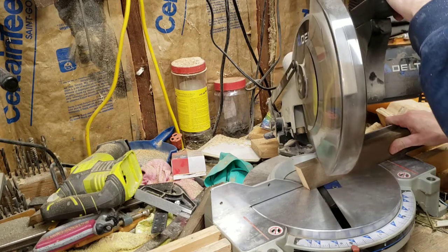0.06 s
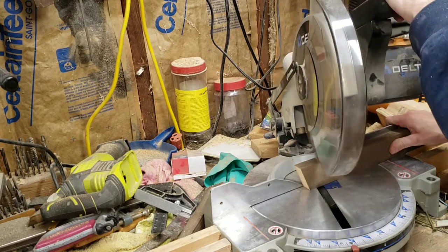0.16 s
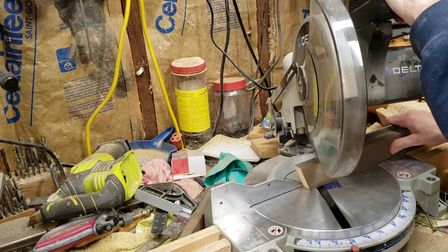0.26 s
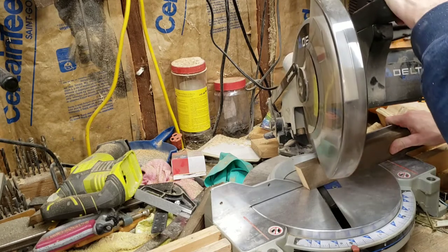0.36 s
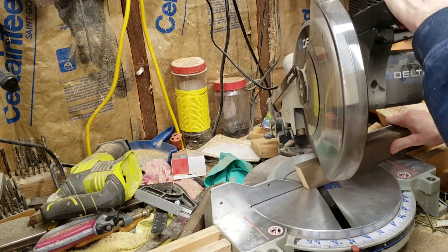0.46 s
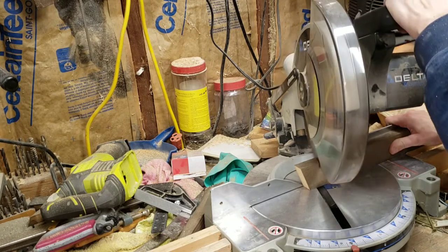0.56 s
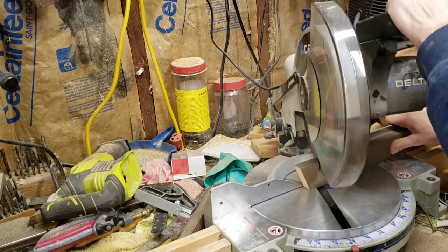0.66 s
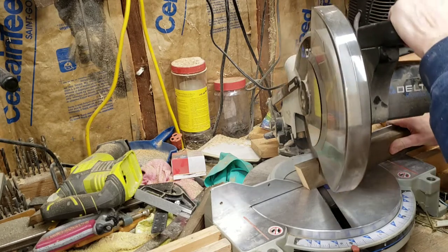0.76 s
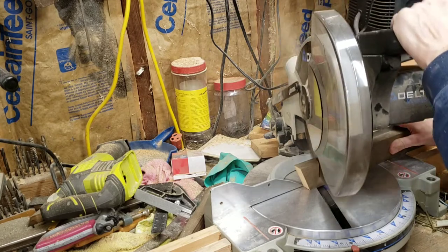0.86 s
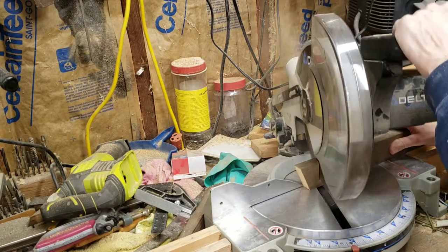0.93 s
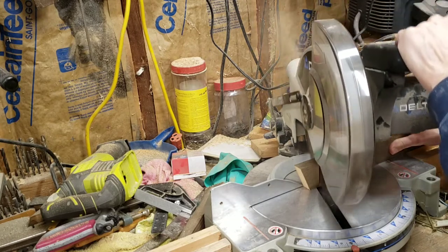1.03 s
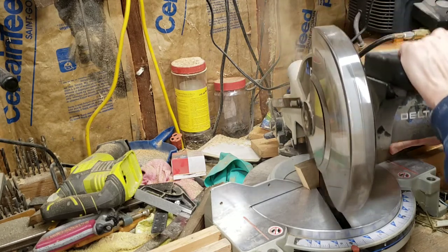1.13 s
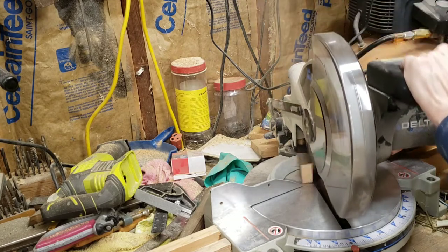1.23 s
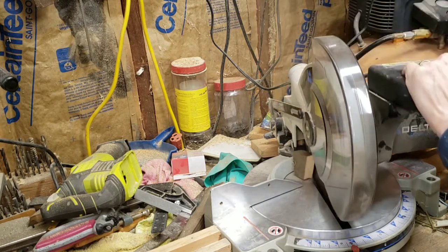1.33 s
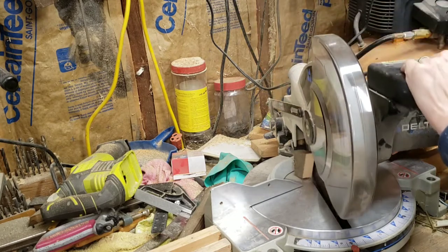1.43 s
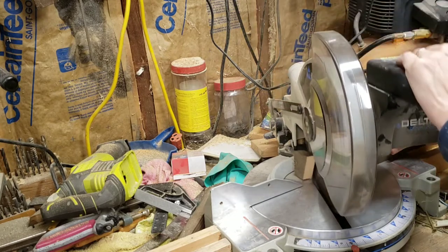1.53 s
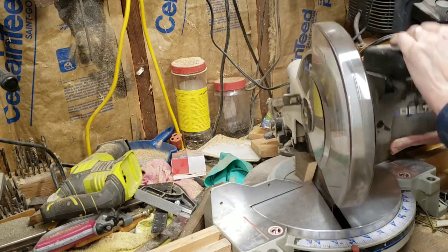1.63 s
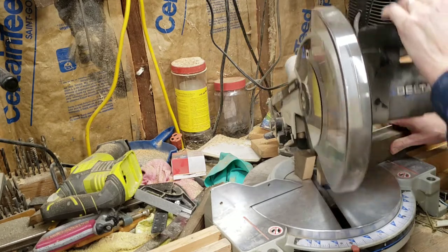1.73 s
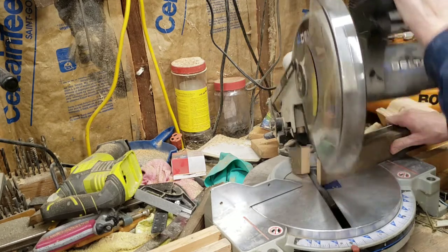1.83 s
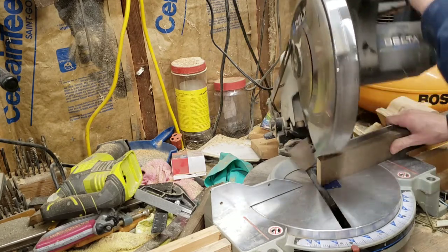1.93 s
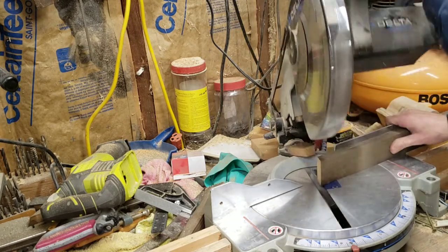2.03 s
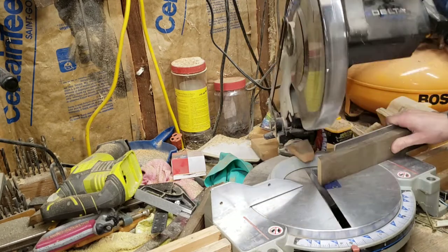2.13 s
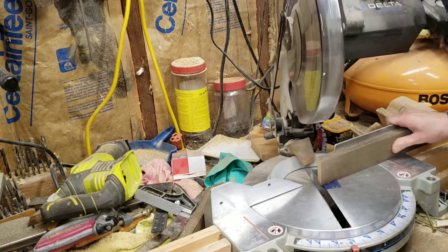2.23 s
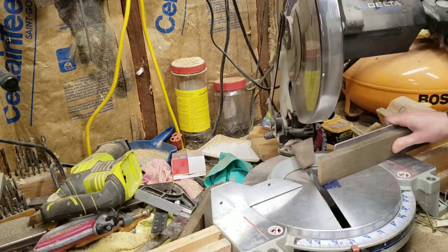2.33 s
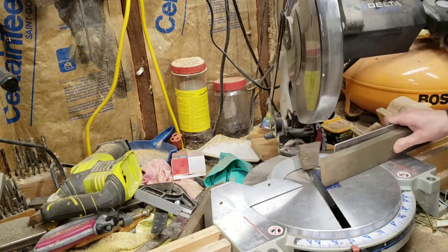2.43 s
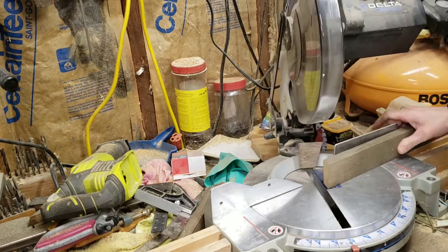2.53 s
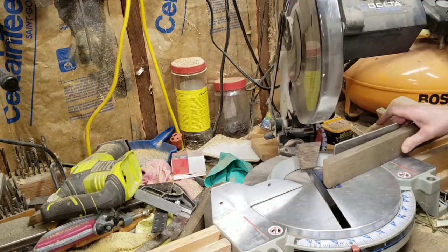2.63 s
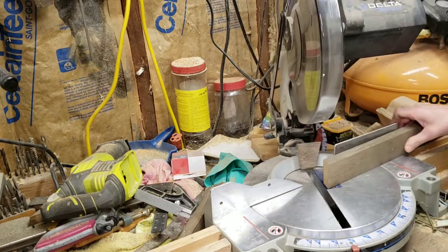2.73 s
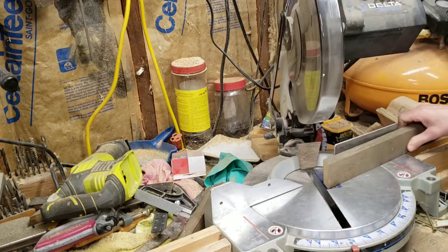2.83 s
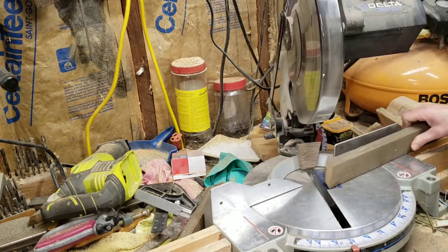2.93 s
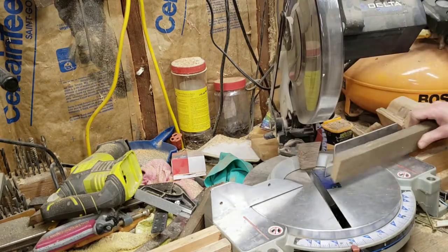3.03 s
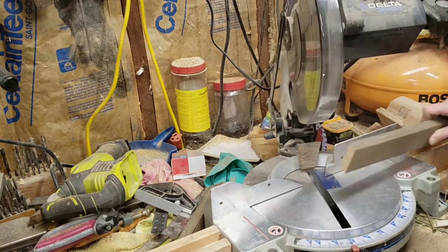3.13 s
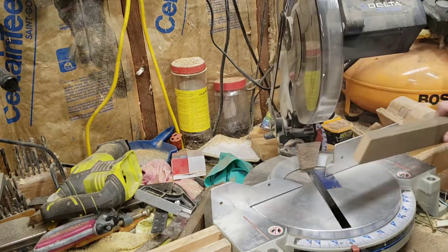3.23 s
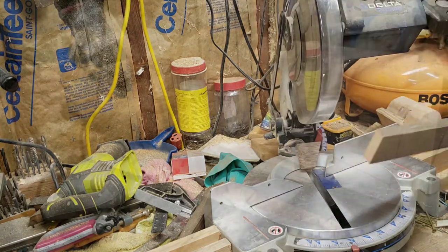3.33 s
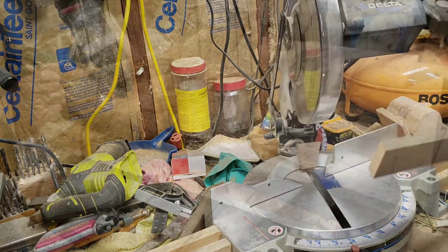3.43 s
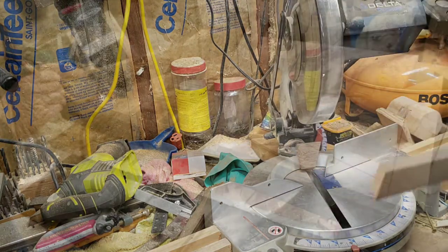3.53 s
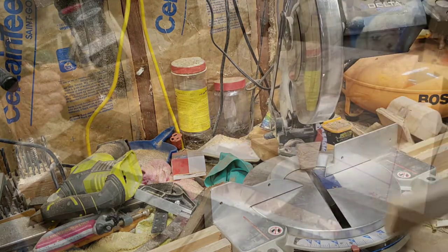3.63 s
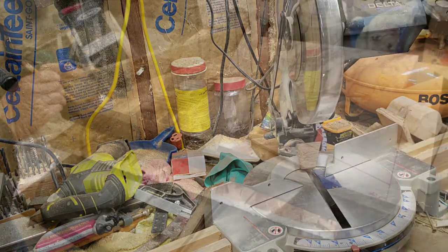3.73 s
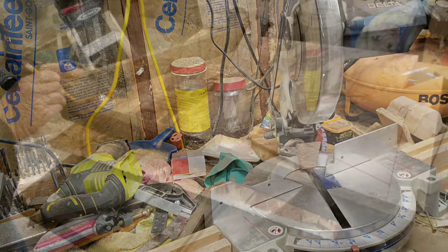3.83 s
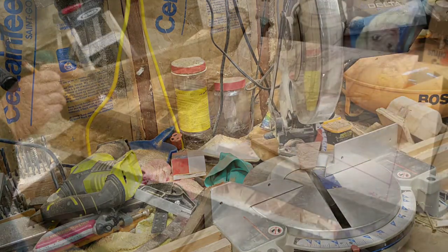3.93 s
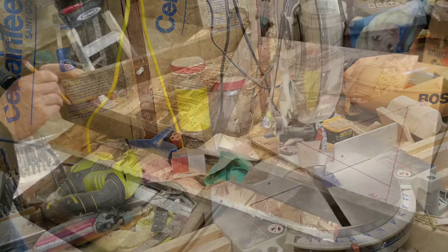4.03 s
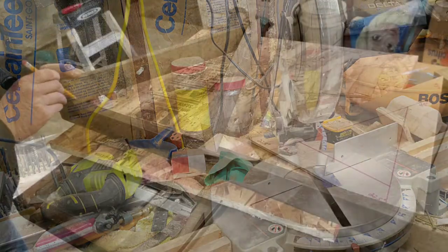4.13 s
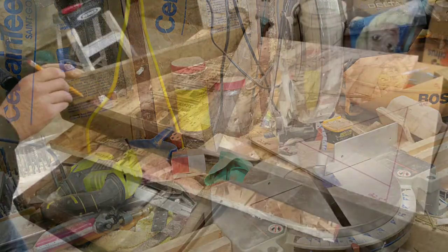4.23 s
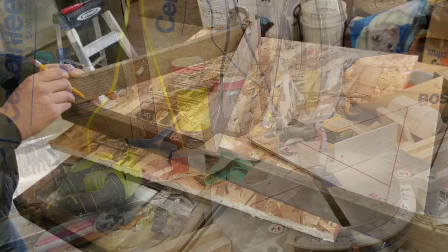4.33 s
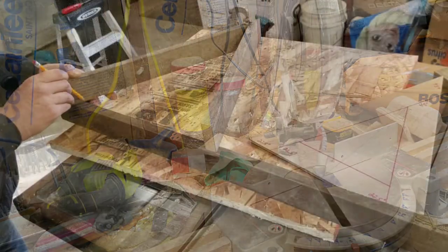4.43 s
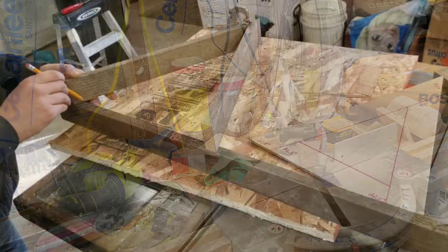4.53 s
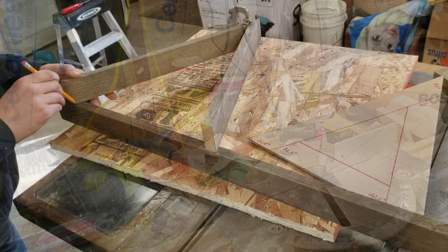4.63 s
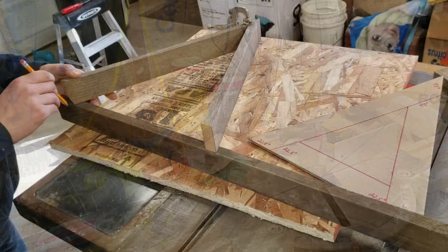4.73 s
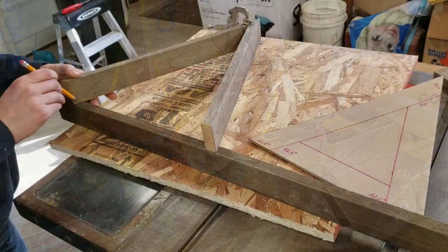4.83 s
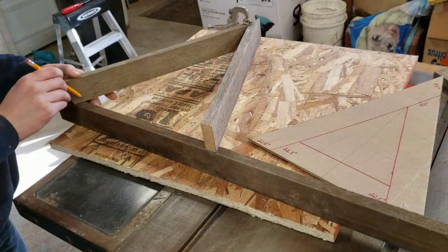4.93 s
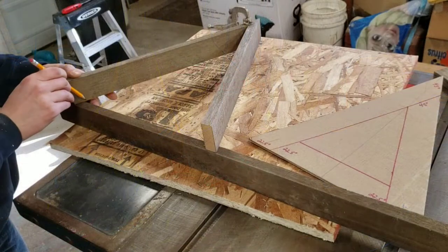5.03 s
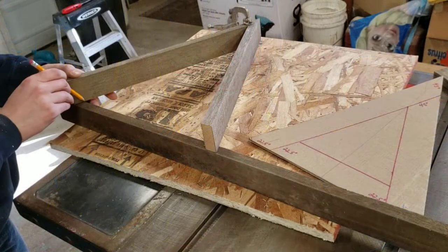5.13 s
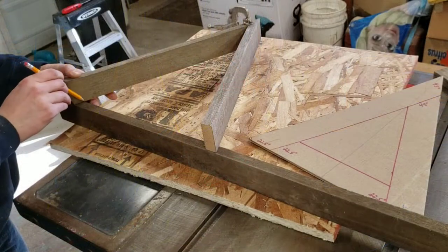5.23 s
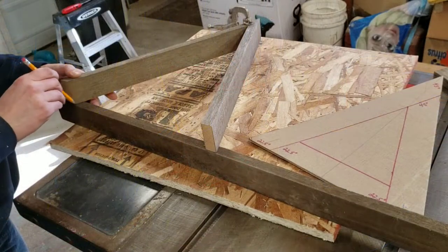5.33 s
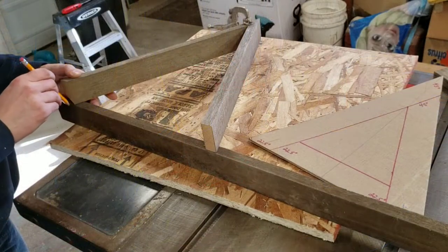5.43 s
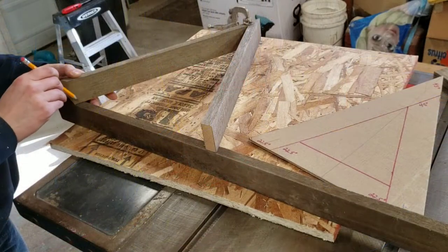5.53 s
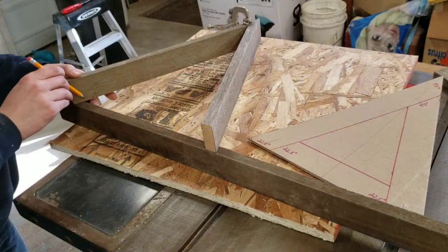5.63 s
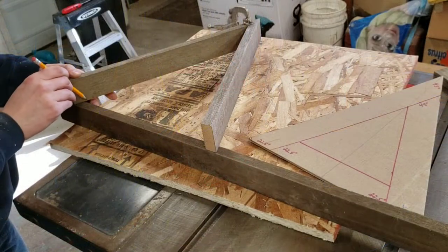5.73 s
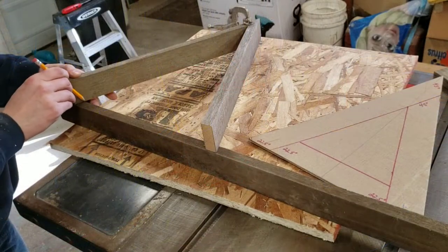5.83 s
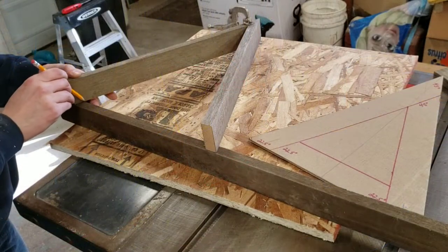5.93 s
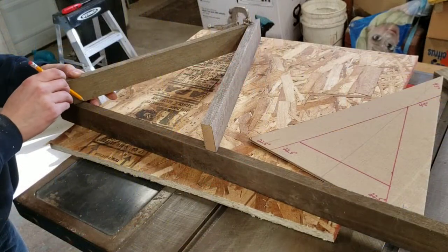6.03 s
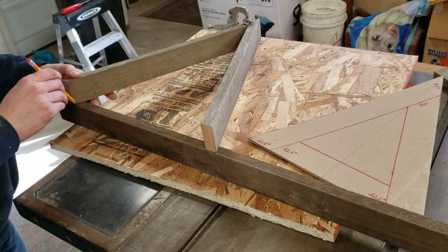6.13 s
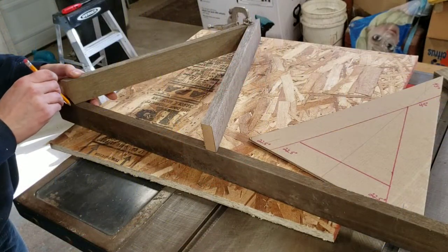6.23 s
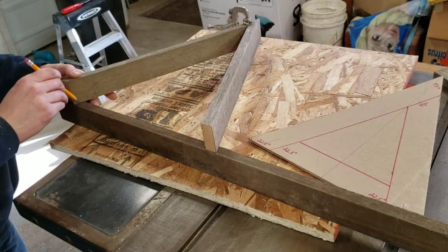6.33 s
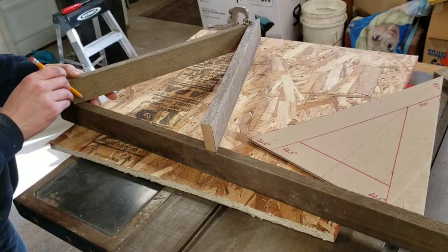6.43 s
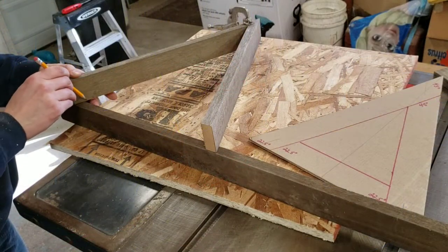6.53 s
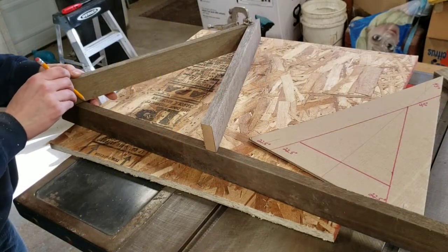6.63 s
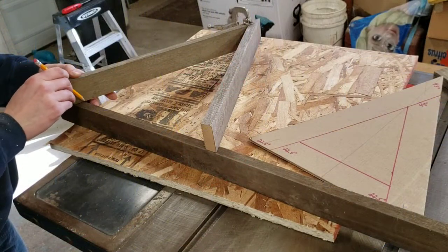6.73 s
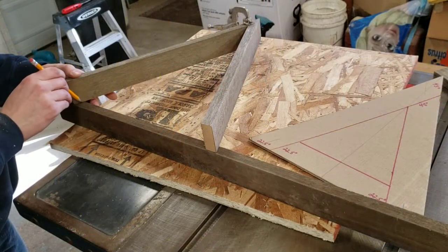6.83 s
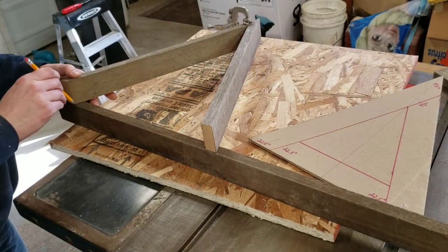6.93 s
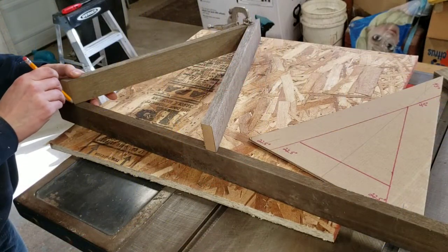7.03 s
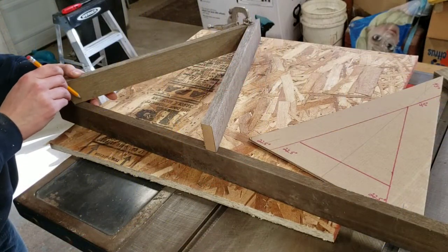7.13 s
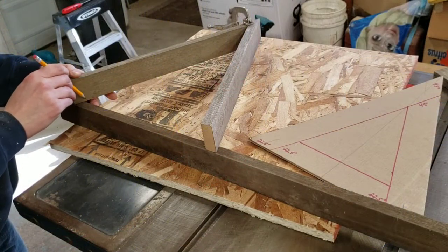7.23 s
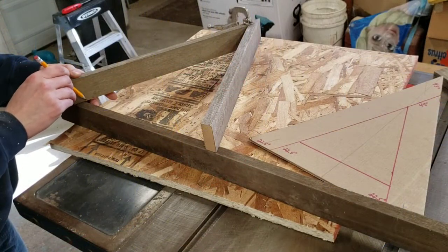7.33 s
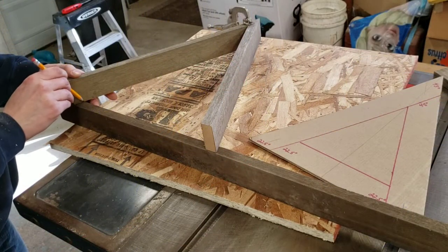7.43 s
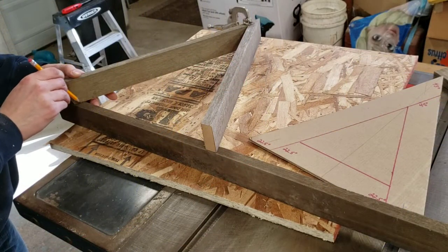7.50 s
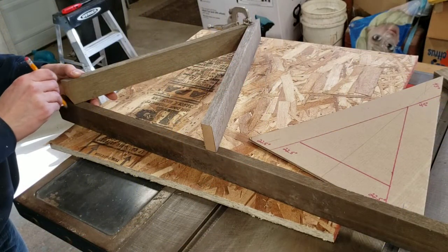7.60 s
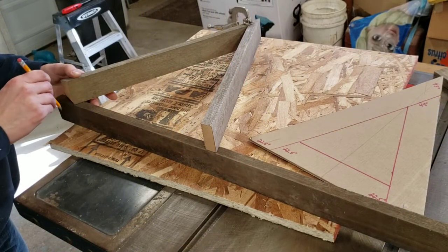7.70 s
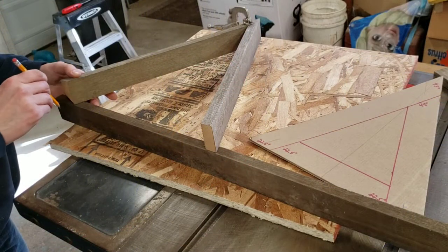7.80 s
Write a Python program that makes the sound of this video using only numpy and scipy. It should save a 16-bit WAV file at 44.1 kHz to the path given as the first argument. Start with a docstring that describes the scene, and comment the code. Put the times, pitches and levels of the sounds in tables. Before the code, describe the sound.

From 0 to about 1.2 s a miter saw is already cutting wood: a loud, harsh, bright rasp, with a high singing tooth tone and metallic blade ringing over motor roar, settling in during the first quarter second. The rasp stops abruptly, leaving the fan roar. At 1.48 s the trigger releases with a small ringing click and narrow hiss; at 1.66-1.85 s the teeth brush wood again. From about 1.8 s a many-toned gear whine appears and slides steadily down in pitch as the blade coasts, fading from 2.5 s to silence at 4.02 s. Almost at once a quiet workshop gradually fades in until 6.1 s: soft hiss, faint drone, low uneven rumble. Short dry board scrapes, gritty with little woody knocks, come near 4.6 (very faint), 5.3, 6.1, 6.9 and 7.5 s. Close stereo, short room reflections.

```python
"""A miter saw finishes a cut through a board, brushes the wood again as it lifts, and coasts down with a gear whine.
Rasping teeth, lines locked to the blade speed, fixed ringing modes and a fan roar make up the saw.
It fades out; after a short silence a quiet workshop fades in, with shaped hiss, a faint drone and rumble.
There a wooden board is nudged along a bench in short scrapes: stick-slip clicks ring its modes under bright grit.
A pair of capsules hears it all, alike in the bass and unrelated in the treble."""
import sys
import numpy as np
from scipy import signal
from scipy.fft import rfft, irfft, next_fast_len
from scipy.io import wavfile
from scipy.ndimage import uniform_filter1d

SR = 44100
rng = np.random.default_rng(int(sys.argv[2]) if len(sys.argv) > 2 else 0)


def master(y):
    """Save y as 16-bit WAV."""
    cut = np.clip(np.atleast_2d(y).T, -1, 1)
    pcm = np.round(cut * 32767)  # scale
    wavfile.write(sys.argv[1], SR, pcm.astype(np.int16))


N = 346626
T = np.arange(N) / SR

# Silence between the two places: its start and its end in seconds.
FADE_GAP = (4.02, 4.038)
STOP = round(FADE_GAP[0] * SR)  # samples for which the saw is heard
SAW_T = np.arange(STOP) / SR
# Likeness of the two capsules. Each row: frequency in Hz, left-right correlation.
LIKENESS = [(60, .92), (130, .9), (290, .94), (640, .8), (1410, .35), (3100, 0), (15000, -.05)]


def cutting():
    """Teeth rasp the wood, sing at multiples of the tooth rate and ring the blade plate at its own modes."""
    # Teeth in the wood. Each row: start in seconds, end in seconds, cutting level in dB,
    # tooth tone in dB above it, ring of the blade in dB above it.
    contact_rows = [(-.1, 1.175, -40, 3, 0.4), (1.656, 1.846, -41, -140, 0)]
    # The long cut settles in: start offsets of cutting, tooth tone and ring in dB.
    bite_db = (-2.5, -18, -7.5)
    # Relative spectrum of the rasp. Each row: frequency in Hz, density in dB per Hz.
    rasp_spectrum = [(60, -34), (140, -19.5), (200, -10.5), (270, -15.5), (400, -40), (880, -44),
                     (1500, -23), (2070, -26.5), (2310, 0), (2650, -20), (2920, -2.5), (3190, -7.5),
                     (3880, 0.5), (4860, -1.5), (7190, 1.5), (8410, -8), (12200, 1), (15600, -14)]
    # Pitches of the tooth tone in cycles per blade turn.
    tooth_orders = [40, 80, 120, 160, 200]
    # Each row, one a tooth pitch: relative level in dB, own growth along the cut in dB per second.
    tooth_rows = [(-14, 11), (-6, -8), (-15, -6), (-9.5, -2), (-5.5, -2)]
    # Modes of the blade plate in Hz.
    plate_hz = [3420, 3967, 4269, 4387, 4570, 5163, 5545, 6060, 6500, 7047, 10363, 12478, 13851, 14686,
                14890, 15111]
    # Each row, one a plate mode: width in Hz before widening by half, relative level in dB,
    # growth along the cut in dB per second.
    plate_rows = [(45, -9.5, -12.5), (12, -10.5, 3.5), (16, -18, 14.5), (18, -14.5, 12.5), (29.9, -9, -0.5),
                  (24.2, -9.5, -5), (16, -8, -2), (45, -11, 1.5), (35, -13.5, 2), (24, -7.5, -2),
                  (16, -12.5, -0.5), (30, -23, -3.5), (25, -21.5, -1), (24, -14.5, 1.5), (16, -14.5, 6),
                  (18, -13.5, 3.5)]
    # A broad howl while the blade is deep in the board. Each row: time in seconds, pitch in Hz, level in dB.
    howl_rows = [(0.0, 3654, -38), (0.258, 3710, -42), (0.328, 3750, -35), (0.374, 3680, -47),
                 (0.506, 3755, -35), (0.548, 3760, -51), (0.62, 3700, -47.5)]
    bite_s, touch_s, leave_db_per_s = 0.26, 0.037, 150.5
    shared_tooth_growth_db_per_s = 4.5

    early = np.maximum(1 - SAW_T / bite_s, 0)
    contacts = []
    for start, end, db, _, _ in contact_rows:
        touch_db = stroke(SAW_T, start, end, touch_s, 15, leave_db_per_s)
        contacts.append(gain_of(db + bite_db[0] * early + touch_db))
    # seconds from a moment inside the long cut; zero from the second contact on
    along = np.where(SAW_T < contact_rows[1][0], SAW_T - .6, 0)

    rasp = sum(contacts) * gain_of(3) * noise(rasp_spectrum, patchy_db=1.6, count=STOP)

    tooth_level = sum(c * gain_of(row[3]) for c, row in zip(contacts, contact_rows))
    tooth_level = tooth_level * gain_of(bite_db[1] * early + shared_tooth_growth_db_per_s * along)
    tooth_gains = [gain_of(db + grow * along) for db, grow in tooth_rows]
    sing = tooth_level * orders(tooth_orders, tooth_gains, width=12, flicker_db=2)

    ring_level = sum(c * gain_of(row[4]) for c, row in zip(contacts, contact_rows))
    ring_level = ring_level * gain_of(bite_db[2] * early)
    plate = 0
    for hz, (width, db, grow) in zip(plate_hz, plate_rows):
        plate = plate + gain_of(db + grow * along) * tone(hz * SAW_T, 1.5 * width, 0, flicker_db=1.5)

    howl_cycles = np.cumsum(saw_curve(howl_rows, outside=3700)) / SR
    howl = gain_of(saw_curve(howl_rows, column=2)) * tone(howl_cycles, width=120, steady=0.3)
    return rasp + sing + ring_level * plate + howl


def motor():
    """Fan roar, its treble lifted or dulled by a slow curve, and a hum locked to the shaft turns."""
    # Each row: time in seconds, level of the roar's low part in dB, lift of the air hiss in dB.
    motor_rows = [(0, -41.5, -4.5), (.28, -46, -2.5), (.95, -48.5, -2), (1.25, -49.5, -.5), (1.6, -50, 1.5),
                  (1.84, -50, .6), (2.55, -56, .4), (3.2, -57, .4), (3.7, -53, -.5)]
    # Relative spectrum of the roar. Each row: frequency in Hz, density in dB per Hz.
    roar_spectrum = [(15, -72.5), (25, -37.5), (64, -24), (136, -21), (282, -15), (446, 1), (510, -5.5),
                     (600, -3), (1380, -8.5), (2240, -4.5), (2500, -3), (5460, -3.5), (6950, -11),
                     (8170, -17), (15600, -13)]
    # Pitches of the hum in cycles per blade turn.
    shaft_orders = [1, 5, 5.54]
    # Level of each pitch in dB relative to the roar's low part; the bench resonance also scales the first.
    shaft_db = [-25.5, -26, -19]
    shake_hz, shake_width_hz = 68, 26  # bench resonance

    roar = noise(roar_spectrum, patchy_db=1.5, count=STOP)
    low = signal.sosfiltfilt(signal.butter(2, 1800, fs=SR, output="sos"), roar)
    s, level_db, lift_db = np.transpose(motor_rows)
    body = low + (roar - low) * gain_of(np.interp(SAW_T, s, lift_db))
    # the bench shakes while the shaft rate lies near its resonance
    shake = 1 / (1 + (2 * (speed() - shake_hz) / shake_width_hz) ** 2)
    shaft_gains = [gain_of(db) * (shake if k == 1 else 1) for k, db in zip(shaft_orders, shaft_db)]
    hum = orders(shaft_orders, shaft_gains, width=8, flicker_db=5.0)
    return gain_of(np.interp(SAW_T, s, level_db)) * (body / np.std(low) + hum)


def gear_whine():
    """Unloaded gears sing at multiples of the falling speed, louder where the housing passes the pitch."""
    # Pitches of the gear lines in cycles per blade turn.
    gear_orders = [3, 4, 6.55, 30.5, 32, 34.5, 35, 36, 37, 37.5, 40, 72, 80, 107, 108, 109, 144, 224.5]
    # Relative level of each line in dB, before the housing.
    gear_db = [-26, -19.5, -16.5, -18.5, -18.5, -16.5, -16.5, -3, -15, -17.5, -12, -17, -18, -14, -9, -13.5,
               -9, -11.5]
    # What the housing passes. Each row: frequency in Hz, gain in dB.
    housing_gain = [(170, -24), (198, 1.5), (222, -17), (275, -4.5), (340, 2.5), (420, -5), (1650, 4.5),
                    (1770, 0), (1880, 4.5), (2250, 1), (2550, 0), (3700, -10.5), (4400, 6.5), (5600, 3),
                    (6300, 7.5), (7300, 5), (8200, -12), (10000, -17), (11000, -6), (15000, -5)]
    # Start in seconds, full in seconds, level in dB, early excess in dB, settling time in seconds.
    whine_settings = (1.8, 2.03, -47.5, 4, 0.06)

    gains = [gain_of(db + read(housing_gain, k * speed())) for k, db in zip(gear_orders, gear_db)]
    start, full, db, excess_db, settle = whine_settings
    excess = excess_db * np.exp(-np.maximum(SAW_T - full, 0) / settle)
    whine_db = db + stroke(SAW_T, start, full, full - start, 27, 0) + excess
    return gain_of(whine_db) * orders(gear_orders, gains, width=17, flicker_db=2.4)


def housing_ring():
    """Housing modes ring at fixed pitches, each swelling to its peak and dying away."""
    # Each row: frequency in Hz, width in Hz, start in seconds, peak in seconds,
    # fall in dB per second, level in dB.
    housing_rows = [(2915, 32, 2.07, 2.2, 36, -45.5), (7590, 50, 1.48, 1.56, 75, -50),
                    (7570, 50, 2.6, 3.2, 2, -56), (7220, 35, 2.3, 3.4, 12, -52),
                    (3650, 40, 1.8, 2.0, 41, -50)]
    out = 0
    for hz, width, start, peak, fall, db in housing_rows:
        level_db = db + stroke(SAW_T, start, peak, peak - start, 3.7, fall)
        out = out + gain_of(level_db) * tone(hz * SAW_T, width, 0.18)
    return out


def trigger():
    """The trigger is let go: a ringing click with a short broad tick, and a narrow hiss starting with it."""
    # Click: level in dB, ring in Hz, time to fall 60 dB in seconds.
    click_settings = (-38, 5680, .12)
    # Hiss: level in dB, early excess in dB, held until in seconds, settling time in seconds.
    hiss_settings = (-50.5, 5.5, 2.0, 0.1)
    # Relative spectrum of that hiss. Each row: frequency in Hz, density in dB per Hz.
    hiss_band = [(3000, -39), (5200, -16), (6600, -2.5), (7500, 1), (8000, -8.5), (9000, -41), (15600, -32)]
    release_s = 1.483

    hiss = noise(hiss_band, patchy_db=1.8, count=STOP)
    db, excess_db, held, settle = hiss_settings
    hiss = hiss * gain_of(db + excess_db * np.exp(-np.maximum(SAW_T - held, 0) / settle))

    db, hz, t60 = click_settings
    since = np.maximum(SAW_T - release_s, 0)
    tick = tone(4270 * SAW_T, width=900, steady=0) * np.exp(-since / 0.013)
    click = tone(hz * SAW_T, width=20, steady=.8) + .6 * tick
    return (since > 0) * (gain_of(db - 60 * since / t60) * click + hiss)


def board():
    """Dense stick-slip clicks ring the board's modes; grit adds a bright, chattering rasp."""
    # Each row: start in seconds, length in seconds, pressure in dB at the start, at the end.
    scrape_rows = [(4.631, 0.083, -41, -40), (5.335, .081, -40.5, -43), (6.121, .12, -42, -47.5),
                   (6.881, .14, -41.5, -42.5), (7.523, .007, -48, -48.5), (7.552, .086, -42.5, -39)]
    # The board catches and slips. Each row: time in seconds, strength in dB before shaping and mixing.
    slip_rows = [(4.513, -33.5), (4.634, -30), (5.335, -29), (5.343, -29), (6.122, -33), (6.128, -29),
                 (6.137, -32), (6.21, -38), (6.226, -31.5), (6.881, -30.5), (6.955, -36), (6.996, -34.5),
                 (7.007, -37), (7.449, -41.5), (7.495, -31.5), (7.524, -27.5), (7.54, -33), (7.557, -41),
                 (7.615, -29.5)]
    # Modes of the board. Each row: frequency in Hz, width in Hz, relative level in dB.
    mode_rows = [(218, 70, -8.5), (315, 72, -2.5), (395, 70, -0.5), (655, 80, -3), (806, 23, -12.5),
                 (1130, 160, -0.5), (1610, 310, -2), (1816, 200, -4.5), (2650, 410, -19.5),
                 (3920, 110, -42)]
    # Relative spectrum of the grit. Each row: frequency in Hz, gain in dB.
    grit_spectrum = [(1180, -24), (2000, -4), (2500, -13), (3020, -0.5), (3380, -11.5), (3710, -4),
                     (7200, -11), (8620, -21.5), (12200, -7.5), (15600, -22)]
    grab_s, lift_db_per_s = 0.0033, 620  # rise and fall of a scrape
    grit_db, grit_fall_db_per_s = -0.5, 68  # grit relative to the pressure, wearing off along the stroke

    press, grit = 0, 0
    for start, length, first_db, last_db in scrape_rows:
        along = np.clip(T - start, 0, length)
        push_db = first_db + (last_db - first_db) * along / length
        push = gain_of(push_db + stroke(T, start, start + length, grab_s, 14, lift_db_per_s))
        press = press + push
        grit = grit + push * gain_of(grit_db - grit_fall_db_per_s * along)

    # about 5000 clicks a second, of uneven size
    sizes = rng.standard_normal(N) * gain_of(2.0 * rng.exponential(1, N))
    clicks = evened(sizes * (rng.random(N) < 5000 / SR))

    t = np.arange(3000) / SR
    modes = 0
    for k, (hz, w, db) in enumerate(mode_rows):
        decay = np.exp(-np.pi * w * t)
        modes = modes + (-1) ** k * gain_of(db) * np.sqrt(w) * decay * np.sin(2 * np.pi * hz * t)
    # a narrow board radiates no bass
    modes = signal.sosfilt(signal.butter(2, 160, "high", fs=SR, output="sos"), modes)
    modes /= np.linalg.norm(modes)

    slips = np.zeros(N)
    for s, db in slip_rows:
        slips[round(s * SR)] = gain_of(db)
    burst = (1 - np.exp(-t / 0.00032)) * np.exp(-t / 0.0031)  # each slip is a short burst
    snap = signal.oaconvolve(slips, burst)[:N]

    # small catches at an uneven rate around 75 a second
    wobble = evened(uniform_filter1d(rng.standard_normal(N), 500))
    judder = np.cumsum(75 * gain_of(5.0 * wobble)) / SR
    chatter = evened(.35 + np.exp(-(judder % 1) / .22))

    wood = signal.oaconvolve((press + 0.45 * snap) * clicks, modes)[:N]
    fine = evened(colour(clicks + 0.6 * rng.standard_normal(N), grit_spectrum))
    return wood + (grit * chatter + 0.55 * snap) * fine


def room(x):
    """Reflections as sparse taps of random sign, each band dying at its own speed."""
    # Each row: frequency in Hz, time to fall 60 dB in seconds.
    decay_times = [(200, 0.11), (1000, 0.22), (4000, 0.25), (12000, 0.11)]
    taps = np.zeros((2, SR // 2))
    at = np.arange(100, SR // 2 - 20, 20)
    at = at + rng.integers(0, 20, (2, len(at)))
    np.put_along_axis(taps, at, rng.choice([-1., 1.], at.shape), 1)
    hz, t, z = signal.stft(taps, SR, nperseg=256)
    decay = gain_of(-60 * t / read(decay_times, hz)[:, None])
    tail = signal.istft(z * decay, SR, nperseg=256)[1]
    wet = signal.fftconvolve(x[None], tail / np.linalg.norm(tail[0]), axes=1)[:, :N]
    return paired(*wet, size=256)


def workshop_air():
    """Still air: shaped hiss with a few droning pitches, noise narrowed to resonance peaks."""
    # Relative spectrum of the hiss. Each row: frequency in Hz, density in dB per Hz.
    hiss_spectrum = [(88, -22), (150, -6.5), (445, -2), (520, -4), (632, -5), (782, -3.5), (846, -9.5),
                     (1400, -13), (2030, -24), (2820, -13.5), (3490, -32.5), (4160, -13.5), (5050, -23.5),
                     (5570, -20), (15600, -16)]
    # Droning pitches. Each row: frequency in Hz, width in Hz (held to 28 at most), relative level in dB.
    drone_rows = [(536, 68, -1.5), (787, 20, -2), (1367, 46, -7.5)]
    air_db, floor_db = -57.5, -81  # hiss level, and what stays of it under the fade

    hz = np.fft.rfftfreq(N, 1 / SR)
    peaks = sum(gain_of(db) / (1 + (2 * (hz - f) / min(w, 28)) ** 2) for f, w, db in drone_rows)
    flat = noise([(20, 0), (20000, 0)], patchy_db=-2.0)
    drone = evened(irfft(rfft(flat) * peaks, N))
    air = noise(hiss_spectrum, patchy_db=1.5) + gain_of(-7.5) * drone
    return np.hypot(gain_of(air_db) * fade_in(), gain_of(floor_db)) * air


def workshop_rumble():
    """Low noise of lumpy level, with one swell as the workshop comes in."""
    # Relative spectrum of the rumble. Each row: frequency in Hz, density in dB per Hz.
    rumble_spectrum = [(12, -40), (20, -12.5), (43, -1), (59, 1), (103, -3.5), (125, -11), (200, -21),
                       (260, -30), (440, -120)]
    # Each row: time in seconds, level in dB before the lumps and the fade-in.
    rumble_level = [(4.12, -76), (4.2, -64), (5.1, -61.5), (5.7, -60), (6.2, -66.5), (6.55, -62),
                    (7.05, -59), (7.3, -64), (7.5, -58), (7.86, -69)]
    # Low swell: peak in seconds, level in dB, rise in seconds, fall in dB per second.
    thump_settings = (4.19, -57, .03, 80)
    waver_db = 1.4

    lumps = uniform_filter1d(uniform_filter1d(rng.standard_normal(N), size=3000), size=3000)
    lumps = evened(lumps)
    peak, db, rise, fall = thump_settings
    thump = gain_of(db + stroke(T, peak - rise, peak, rise, 22, fall))
    level = fade_in() * gain_of(curve(rumble_level) + waver_db * lumps) + thump
    return level * noise(rumble_spectrum, patchy_db=2.0)


def speed():
    """Blade turns per second: driven, then coasting freely with a steady share lost each second."""
    # Driven and in the first moments of coasting. Each row: time in seconds, speed in turns per second.
    speed_rows = [(0, 71.6), (.2, 73.11), (.35, 74.04), (.5, 74.67), (.65, 75.01), (.95, 74.78),
                  (1.25, 74.33), (1.5, 75.4), (1.65, 74.6), (1.95, 70.5)]
    coast_per_s = .2275
    s, last = speed_rows[-1]
    return np.where(SAW_T < s, saw_curve(speed_rows), last * np.exp(-coast_per_s * (SAW_T - s)))


def orders(multiples, gains, width, flicker_db):
    """Lines locked to the blade speed; the higher ones blur and flicker more."""
    turns = np.cumsum(speed()) / SR
    out = 0
    for k, gain in zip(multiples, gains):
        loose = k / (k + 8)
        out = out + gain * tone(k * turns, width * k / 36, 1 - .74 * loose, 1 + flicker_db * loose)
    return out


def tone(cycles, width, steady, flicker_db=0):
    """A line whose size and phase wander, as reflections mix with it; low lines wander alike in both ears."""
    knots = np.arange(0, STOP + 100, 100)
    re, im, flicker = rng.standard_normal((3, 2, len(knots)))
    r = np.exp(-np.pi * width * 100 / SR)
    drift = signal.lfilter([1 - r], [1, -r], re + 1j * im)
    drift = signal.lfilter([1], [1, -r], drift)
    same = np.clip(read(LIKENESS, cycles[-1] / SAW_T[-1]), 0, 1)
    drift[1] = same * drift[0] + np.sqrt(1 - same ** 2) * drift[1]
    drift = steady + (1 - steady) * drift / np.sqrt(np.mean(abs(drift) ** 2))
    flicker = evened(uniform_filter1d(uniform_filter1d(flicker[0], 16), 16))
    drift = drift * gain_of(flicker_db * flicker)
    turn = np.sqrt(2) * np.exp(2j * np.pi * cycles)
    return np.array([(np.interp(np.arange(STOP), knots, d) * turn).real for d in drift])


def noise(spectrum, patchy_db, count=N):
    """Stereo noise of rms 1 with drifting patches: alike in the bass, unrelated in the treble."""
    hz = np.fft.rfftfreq(1024, 1 / SR)
    a, b, c, d, patches = rng.standard_normal((count // 512 + 3, 513, 5)).T
    patches = evened(uniform_filter1d(uniform_filter1d(patches, 10, 0), 3, 1))
    same = np.clip(read(LIKENESS, hz), -1, 1)[:, None]
    left = a + 1j * b
    right = same * left + np.sqrt(1 - same ** 2) * (c + 1j * d)
    z = np.array([left, right]) * gain_of(patchy_db * patches)
    window = np.sqrt(signal.windows.hann(1024, False))
    x = signal.istft(z, SR, window=window, nperseg=1024)[1]
    return evened(colour(x, spectrum)[:, :count])


def paired(a, b, size=1024):
    """Two channels from two sounds: alike in the bass, unrelated in the treble."""
    hz, _, (za, zb) = signal.stft(np.array([a, b]), SR, nperseg=size)
    same = np.clip(read(LIKENESS, hz), -1, 1)[:, None]
    z = np.array([za, same * za + np.sqrt(1 - same ** 2) * zb])
    return signal.istft(z, SR, nperseg=size)[1][:, :N]


def colour(x, spectrum):
    """Weights a sound's frequencies by a spectrum in dB."""
    size = next_fast_len(x.shape[-1])
    gain = gain_of(read(spectrum, np.fft.rfftfreq(size, 1 / SR)))
    return irfft(rfft(x, size) * gain, size)[..., :N]


def gain_of(db):
    """Decibels to amplitude."""
    return 10 ** (np.asarray(db) / 20)


def evened(x):
    """Scales to rms 1."""
    return x / np.sqrt(np.mean(x ** 2) + 1e-20)


def read(points, hz):
    """Reads a spectrum on a log-frequency axis."""
    f, value = np.transpose(points)
    return np.interp(np.log(hz + 1), np.log(f + 1), value)


def curve(rows, column=1, outside=-140):
    """One column of a table at every sample."""
    rows = np.array(rows)
    return np.interp(T, rows[:, 0], rows[:, column], outside, outside)


def saw_curve(rows, column=1, outside=-140):
    """A curve cut to the time the saw is heard."""
    return curve(rows, column, outside)[:STOP]


def stroke(t, start, end, rise_s, rise_db, fall_db_per_s):
    """Attack, hold, release in dB."""
    attack = np.interp(t, [start, start + rise_s], [-rise_db, 0], -140, 0)
    return attack - fall_db_per_s * np.maximum(t - end, 0)


def fade_in():
    """Gain of the workshop as it comes in: a straight line over 2.08 s."""
    return np.clip((T - FADE_GAP[1]) / 2.08, 0, 1)


def scene():
    """The saw fades out along a straight line, then the bench and its workshop fade in."""
    fade_out = np.clip((FADE_GAP[0] + .005 - SAW_T) / 1.48, 0, 1)
    saw = fade_out * (cutting() + motor() + gear_whine() + housing_ring() + trigger())
    saw = np.pad(saw, ((0, 0), (0, N - STOP)))
    wood = board()
    scrapes = fade_in() * (gain_of(-1.6) * wood + gain_of(-7) * room(wood))
    bench = (scrapes + workshop_air() + workshop_rumble()) * (T > FADE_GAP[1])
    left = np.roll(saw[0], 2) + bench[0]  # the saw reaches the right capsule first
    right = saw[1] + np.roll(bench[1], 6)  # the bench reaches the left one first
    return np.array([left, right])


def record(dry):
    """The left capsule is a little more sensitive; then a low-pass filter limits the band."""
    # Each row: frequency in Hz, left minus right in dB.
    lean_rows = [(30, 3), (180, 2), (550, 1.2), (1650, 2.2), (4970, 2.5), (15000, 3.6)]
    edge_hz = 15580
    left = colour(dry[0], [(hz, db / 2) for hz, db in lean_rows])
    right = colour(dry[1], [(hz, -db / 2) for hz, db in lean_rows])
    low_pass = signal.firwin(511, edge_hz, window=("kaiser", 9), fs=SR)
    return signal.oaconvolve(np.array([left, right]), low_pass[None], "same")


dry = scene()
out = record(dry)
master(out)
```